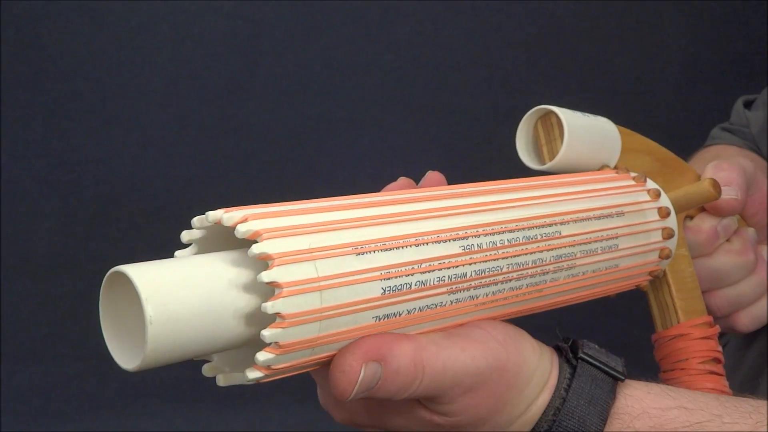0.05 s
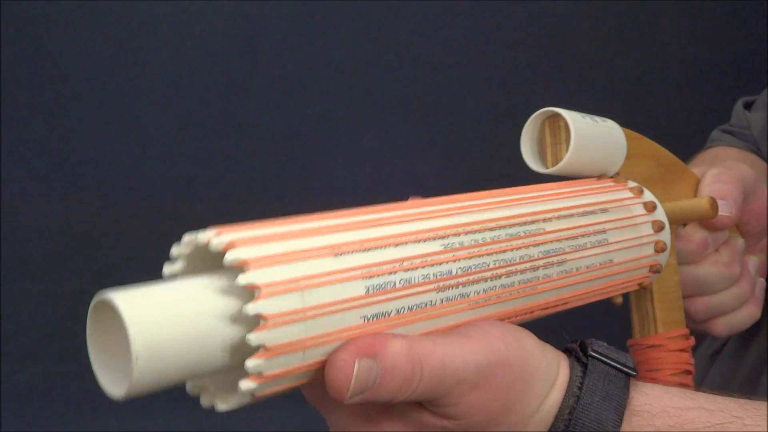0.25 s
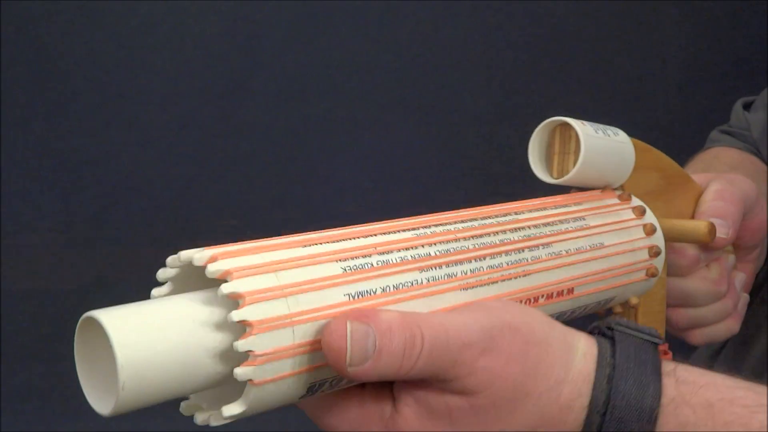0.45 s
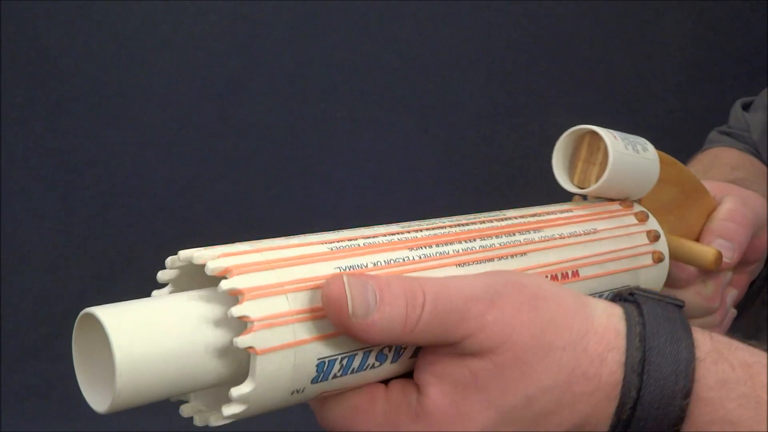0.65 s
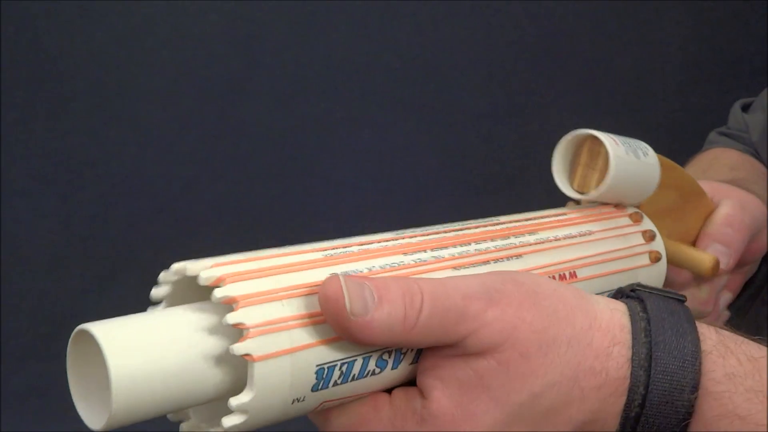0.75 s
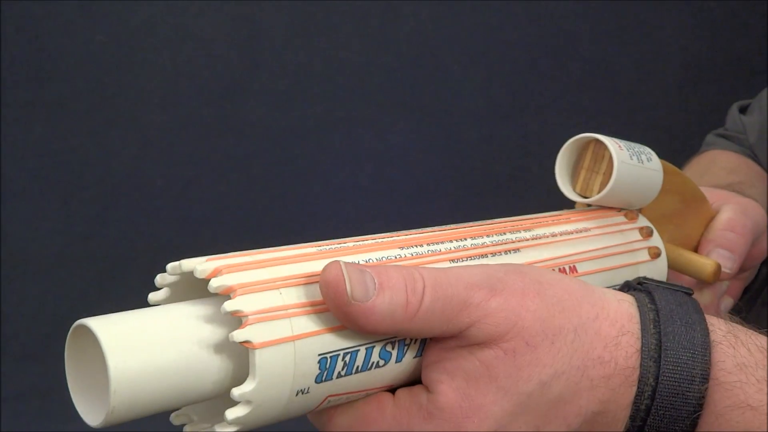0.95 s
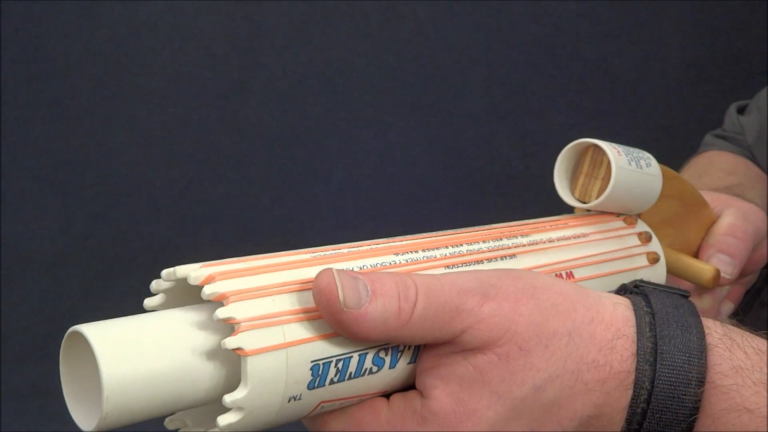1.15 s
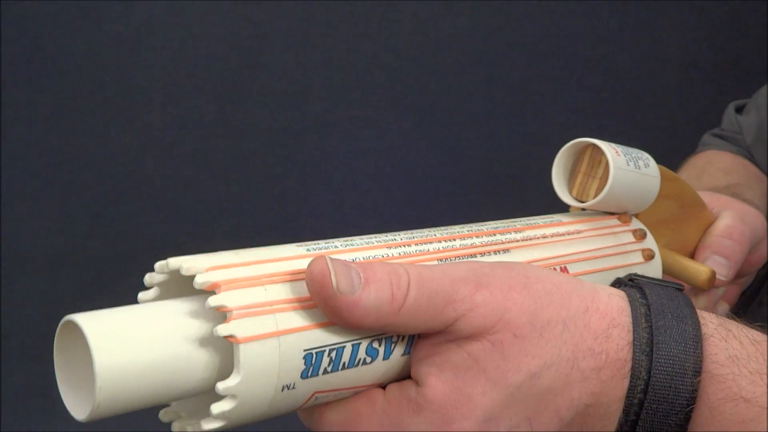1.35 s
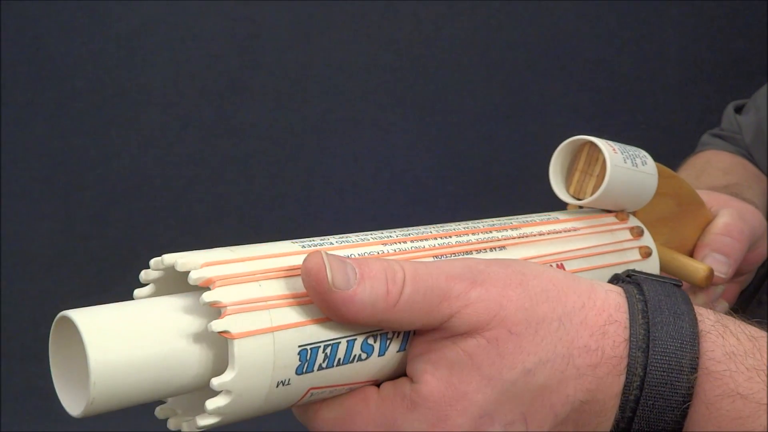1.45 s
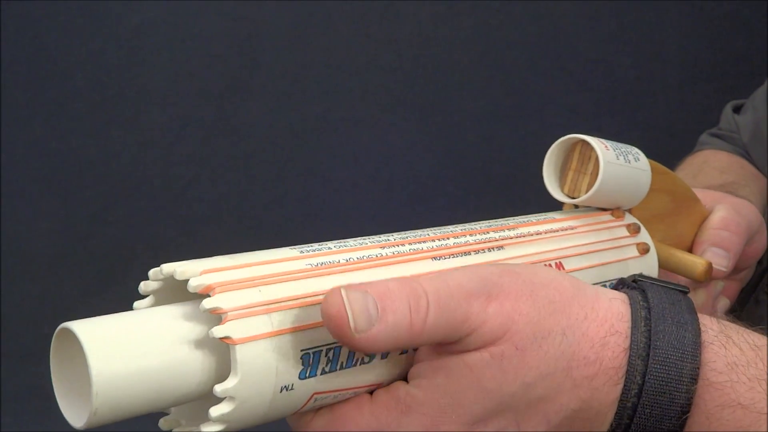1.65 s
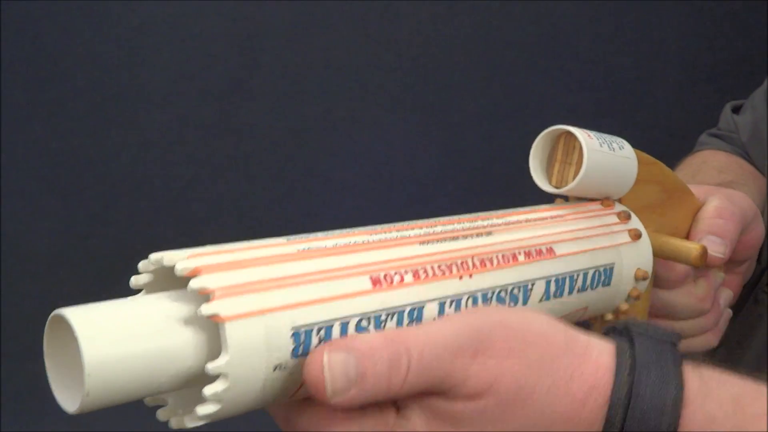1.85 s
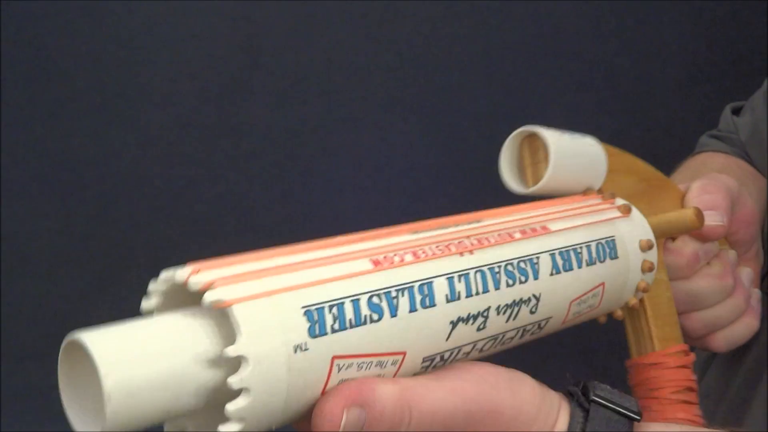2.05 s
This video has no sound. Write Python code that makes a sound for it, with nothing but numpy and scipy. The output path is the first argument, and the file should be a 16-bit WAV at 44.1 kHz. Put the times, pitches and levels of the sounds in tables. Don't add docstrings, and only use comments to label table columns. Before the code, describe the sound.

Rapid burst of loud cracks from a twisted rubber-band toy gun, then one more after a pause.

```python
import sys
import numpy as np
from scipy import signal
from scipy.fft import rfft, irfft, next_fast_len
from scipy.io import wavfile
from scipy.ndimage import uniform_filter1d, minimum_filter1d

SR = 44100
rng = np.random.default_rng(int(sys.argv[2]) if len(sys.argv) > 2 else 0)


def magnitude_from_level(level_db):
    exponent = np.asarray(level_db, float) / 20
    return 10 ** exponent


def waveform_to_disk(signal):
    frames = np.transpose(np.atleast_2d(signal))
    scaled = np.clip(frames, -1, 1) * 32767
    samples = np.round(scaled).astype(np.int16)
    wavfile.write(sys.argv[1], SR, samples)


N = 92610

# frequency in Hz, level in dB.
AIR_SPECTRUM = [(15, -28), (25, -7), (365, -3.5), (437, -1.5), (692, -12), (916, -2), (1100, -8.5),
                (1650, -7.5), (11200, -33.5), (14600, -61), (22000, -120)]
# frequency in Hz, side over mid in dB.
AIR_WIDTH = [(60, -16), (350, -1), (2020, -3.5), (11800, -1.5)]
# frequency in Hz, t60 in s.
ROOM_DECAY = [(200, 0.36), (1000, 0.38), (3500, 0.29), (7000, 0.28), (11000, 0.19)]
# time in seconds, level in dB.
SLIDE_LEVEL = [(0, -71), (.17, -66), (0.204, -33), (.24, -50), (1.2, -91), (1.295, -55), (1.33, -53),
               (1.76, -65), (1.8, -60.5), (1.95, -60.5), (2.1, -54.5)]
# frequency in Hz, level in dB.
SKIN_SPECTRUM = [(1000, -30), (2500, -2), (4000, 0.5), (7000, 3.5), (11000, 3.5)]
# frequency in Hz, width in Hz, level in dB.
TUBE_MODES = [(176, 86, -19.5), (392, 220, -14.5), (980, 460, -11.5), (1640, 880, -13), (3220, 460, -0.5),
              (4650, 643, 1), (5560, 2310, -6), (7850, 880, -2.5), (8910, 880, -4.5), (10810, 1110, -1)]
# start in seconds, peak in dB, room in dB, t60 in s, tilt in dB per octave.
TICK_EVENTS = [(.1362, -33, 2.5, 0.0033, -7.5), (.199, -33, -4, .008, -14),
               (.2065, -9.5, -4.5, 0.0088, -6.5), (.3205, -11.5, 3.5, 0.0031, -6),
               (.3233, -6, -5.5, 0.0038, -7), (.4210, -8, -11, 0.0083, -7), (.745, -32, -4, .004, 0),
               (.8077, -16.5, -1.5, 0.0093, -6.5), (.8512, -26.5, -8, .004, 5),
               (1.2936, -37, -9, 0.0069, -15), (1.6757, -18, -9, 0.002, 4), (1.7146, -36.5, -10, 0.0033, 1)]
# start in seconds, peak in dB before the limiter, floor echo in dB, tilt in dB per
SNAP_EVENTS = [
    (0.2298, 9.5, -7, .1),
    (0.3422, 9, -2.5, 0.3),
    (0.4606, 9, -5, 0.4),
    (0.561, 10, -4, 0.85),
    (.6847, 8.5, -5.5, -0.05),
    (1.3245, 8.5, -7, 0),
]
# start in seconds, frequency in Hz, level in dB, t60 in s.
RING_TONES = [(1.506, 189, -36, 0.83), (1.504, 873, -28.5, 0.27), (1.506, 1109, -25.5, 0.25),
              (.856, 410, -34, 0.22), (.851, 735, -20, 0.065), (1.045, 575, -33, 0.18),
              (.88, 188, -42.5, 0.37), (.344, 1000, -1, 0.024), (.385, 1300, -24.5, 0.14),
              (.563, 900, -16, 0.049), (1, 610, -28, 0.17)]
# start in seconds, level in dB, rise in s, t60 in s.
LANDING_EVENTS = [
    (.851, -24, 0.00088, 0.046),
    (.958, -40.5, .015, 0.18),
    (1.024, -28, 0.0058, 0.085),
    (1.5025, -20.5, 0.00043, 0.064),
    (.735, -29.5, 0.0072, 0.067),
    (0.799, -39, 0.0081, 0.087),
    (1.78, -51, 0.0057, 0.12),
]
# frequency in Hz, width in Hz, level in dB.
STRUCK_MODES = [
    [(386, 47, -8.5), (769, 120, 4.5), (876, 66, 2), (2100, 1700, -12.5), (5240, 1100, -10.5)],
    [(790, 620, -10), (1850, 1600, 7), (3430, 1200, -5.5), (6700, 2200, -34)],
    [(600, 114, -7.5), (747, 170, 0), (1530, 900, -5.5), (2850, 230, 4), (3410, 490, 4), (5100, 840, -5.5),
     (9200, 2400, -32)],
    [(914, 73, 3.5), (1170, 120, 3), (1830, 580, -0.5), (2450, 370, -14.5), (4170, 2200, -1.5),
     (9100, 6600, -20.5)],
    [(253, 200, -1.5), (925, 190, 0), (1780, 880, 1)],
    [(80, 65, -2), (295, 150, -9), (1210, 1800, 5)],
    [(2320, 830, 3), (3750, 540, 5)],
]

AIR_DB = -50.5
ROOM_GAP_S, ROOM_FILL_S = 0.0013, 0.0013
ROOM_GRAIN_DB, ROOM_SIDE_DB = 2.5, -10.5
ROOM_SAME = 0.46
HANDS_WET_DB = -4.5
FLOOR_ECHO_S, FLOOR_ECHO_DB = 0.0056, -10
CRACK_T60_S, CRACK_RISE_S, CRACK_NOISE = 0.0075, 0.00038, 0.76
CRACK_FROM_HZ, PIN_SCATTER_DB = 2300, 0.9
SNAP_WET_DB, FLOOR_ECHO_WET_DB = -1, -4
THUMP_DB, THUMP_HZ, THUMP_T60_S = -48, 65.5, 0.23
RING_RISE_S, RING_WOBBLE_RAD = 0.0065, 0.7
LANDING_GAIN_DB, LANDING_WET_DB, LANDING_PAN_DB = 8, -1.5, 1.3
CEILING_DB, RELEASE_S, AHEAD_S = -5, 0.024, 0.0018
TOP_HZ, SKIRT_HZ = 10980, 114
BEND = 0.18


def unit(x):
    return x / np.sqrt(np.mean(x ** 2) + 1e-20)


def drift(count, span):
    return unit(uniform_filter1d(rng.standard_normal(count), size=span))


def along(points, hz):
    f, v = np.transpose(points)
    return np.interp(np.log(hz + 1), np.log(f + 1), v)


def filtered(x, response):
    m = next_fast_len(x.shape[-1] + 8192)
    return irfft(rfft(x, m) * response(np.fft.rfftfreq(m, 1 / SR)), m)[..., :x.shape[-1]]


def body(peaks, sign=-1):
    def response(f):
        total = 0
        for k, (center, width, db) in enumerate(peaks):
            damping = 1j * f * width
            total = total + sign ** k * magnitude_from_level(db) * damping / (center ** 2 - f ** 2 + damping)
        return total
    return response


def burst(rise_s, t60_s, response):
    t = np.arange(SR // 4) / SR
    envelope = (1 - np.exp(-t / abs(rise_s))) * magnitude_from_level(-60 * t / t60_s)
    x = filtered(rng.standard_normal(len(t)) * envelope, response)
    return x / np.abs(x).max()


def add(track, s, sound):
    part = track[round(s * SR):][:len(sound)]
    part += sound[:len(part)]


def tail():
    size = SR // 2
    grain = magnitude_from_level(ROOM_GRAIN_DB * drift(size, 30))
    hz, t, z = signal.stft(rng.standard_normal((2, size)) * grain, SR, nperseg=256)
    decay = magnitude_from_level(-60 * t / along(ROOM_DECAY, hz)[:, None])
    pair = signal.istft(z * decay, SR, nperseg=256)[1][:, :size]
    since_gap_s = np.maximum(np.arange(size) / SR - ROOM_GAP_S, 0)
    mid, side = pair * (1 - np.exp(-since_gap_s / ROOM_FILL_S))
    return (mid + magnitude_from_level(ROOM_SIDE_DB) * side * np.array([[1], [-1]])) / np.linalg.norm(mid)


def room(x):
    return signal.fftconvolve(x[None], tail(), axes=1)[:, :N]


def air():
    def spectrum(hz):
        return magnitude_from_level(along(AIR_SPECTRUM, hz) + [0 * hz, along(AIR_WIDTH, hz)])
    mid, side = filtered(rng.standard_normal((2, N)), spectrum)
    return magnitude_from_level(AIR_DB) / np.std(mid) * np.array([mid + side, mid - side])


def hands():
    s, db = np.transpose(SLIDE_LEVEL)
    grain = rng.standard_normal(N) * magnitude_from_level(2.5 * drift(N, 60))
    rub = unit(filtered(grain, lambda hz: magnitude_from_level(along(SKIN_SPECTRUM, hz))))
    return magnitude_from_level(np.interp(np.arange(N) / SR, s, db)) * rub


def strike(track, usual_walls, s, db, wet_db, t60_s, tilt_db):
    peaks = [(hz, width, top + PIN_SCATTER_DB * rng.standard_normal()) for hz, width, top in TUBE_MODES]

    def tube(f):
        return body(peaks)(f) * (1 + 1j * f / 2000) ** (tilt_db / 6)

    def treble(f):
        return (1j * f / (CRACK_FROM_HZ + 1j * f)) ** 2

    ring = filtered(np.eye(1, 600)[0], tube)
    ring = ring / np.abs(ring).max()
    crack = burst(CRACK_RISE_S, t60_s, tube)[:len(ring)]
    direct = filtered(CRACK_NOISE * crack + (1 - CRACK_NOISE) * ring, treble)
    direct = direct / np.abs(direct).max()
    walls = ROOM_SAME * usual_walls + np.sqrt(abs(1 - ROOM_SAME ** 2)) * tail()
    echo = signal.fftconvolve(ring[None], walls, axes=1) * np.sqrt(0.036 * SR * t60_s) / np.linalg.norm(ring)
    t = np.arange(SR // 8) / SR
    thump = np.sin(2 * np.pi * THUMP_HZ * t) * magnitude_from_level(-60 * t / THUMP_T60_S)
    for side in (0, 1):
        add(track[side], s, magnitude_from_level(db) * direct)
        add(track[side], s, magnitude_from_level(db + wet_db) * echo[side])
        add(track[side], s, magnitude_from_level(db + THUMP_DB) * thump)


def ticks(usual_walls):
    x = np.zeros((2, N))
    for s, db, wet_db, t60_s, tilt_db in TICK_EVENTS:
        strike(x, usual_walls, s, db, wet_db, t60_s, tilt_db)
        strike(x, usual_walls, s + FLOOR_ECHO_S, db + FLOOR_ECHO_DB, wet_db, t60_s, tilt_db)
    return x


def snaps(usual_walls):
    x = np.zeros((2, N))
    for s, db, back_db, tilt_db in SNAP_EVENTS:
        strike(x, usual_walls, s, db, SNAP_WET_DB, CRACK_T60_S, tilt_db)
        strike(x, usual_walls, s + FLOOR_ECHO_S, db + back_db, FLOOR_ECHO_WET_DB, CRACK_T60_S, tilt_db)
    return x


def ringing():
    x, t = np.zeros(N), np.arange(SR // 2) / SR
    for s, hz, db, t60_s in RING_TONES:
        envelope = magnitude_from_level(db - 60 * t / t60_s) * (1 - np.exp(-t / RING_RISE_S))
        phase = 2 * np.pi * hz * t + RING_WOBBLE_RAD * drift(len(t), 700)
        add(x, s, envelope * np.sin(phase))
    return x


def landings():
    x = np.zeros(N)
    for (s, db, rise_s, t60_s), peaks in zip(LANDING_EVENTS, STRUCK_MODES):
        add(x, s, magnitude_from_level(db + LANDING_GAIN_DB) * burst(rise_s, t60_s, body(peaks, sign=0.85)))
    return x


def scene():
    usual_walls = tail()
    skin = hands()
    near = skin + magnitude_from_level(HANDS_WET_DB) * room(skin) + ticks(usual_walls) + snaps(usual_walls)
    slaps = landings()
    far = slaps + ringing() + magnitude_from_level(LANDING_WET_DB) * room(slaps)
    return air() + near + far * magnitude_from_level([[LANDING_PAN_DB], [-LANDING_PAN_DB]])


def limited(x):
    over_db = np.maximum(20 * np.log10(np.abs(x).max(axis=0) + 1e-9) - CEILING_DB, 1e-9)
    ramp, ahead = np.arange(N) / SR / RELEASE_S, max(round(AHEAD_S * SR), 1)
    duck_db = np.exp(np.maximum.accumulate(np.log(over_db) + ramp) - ramp)
    duck_db = uniform_filter1d(-minimum_filter1d(-duck_db, 2 * ahead + 1), ahead)
    return x * magnitude_from_level(-duck_db)


def low_pass(x):
    return signal.sosfilt(signal.butter(12, 12360, fs=SR, output="sos"), x)


def record(dry):
    def lowpass(hz):
        return 1 / (1 + np.exp(np.clip((hz - TOP_HZ) / SKIRT_HZ, -50, 50)))
    x = filtered(limited(dry), lowpass)
    return low_pass(x - BEND * x ** 3)


dry = scene()
out = record(dry)
waveform_to_disk(out)
```